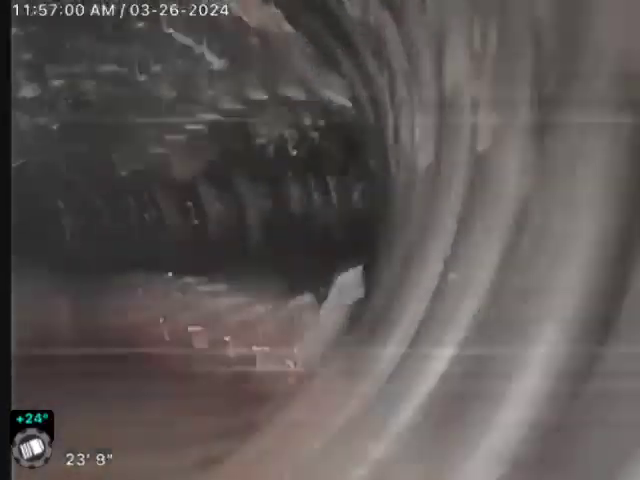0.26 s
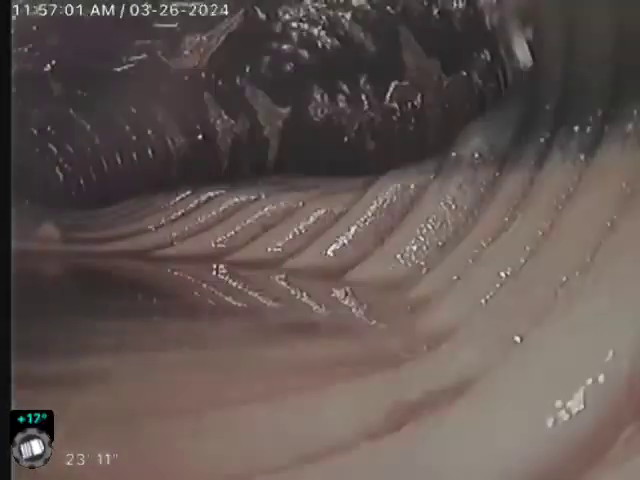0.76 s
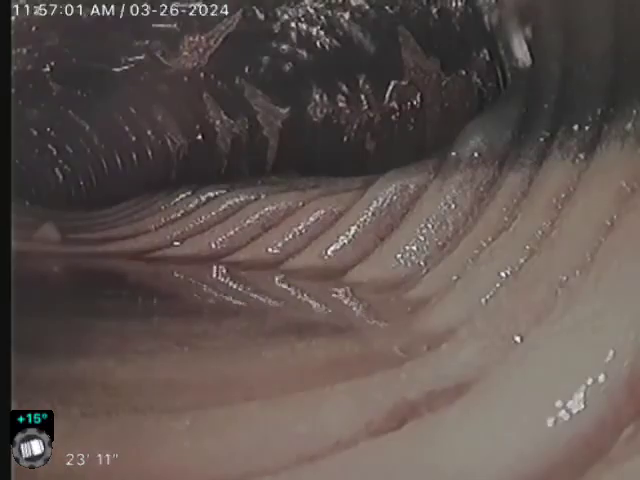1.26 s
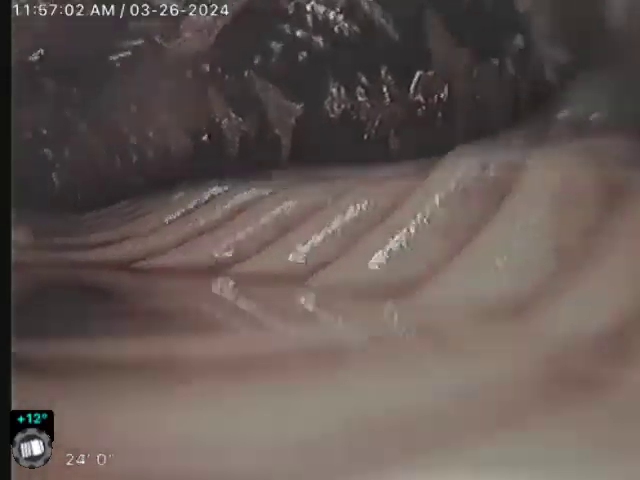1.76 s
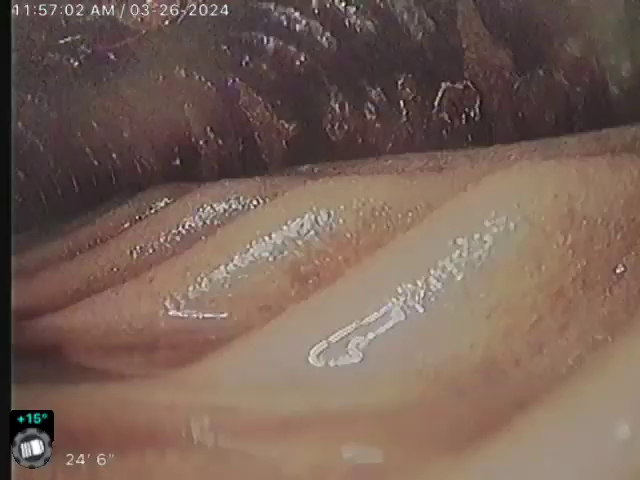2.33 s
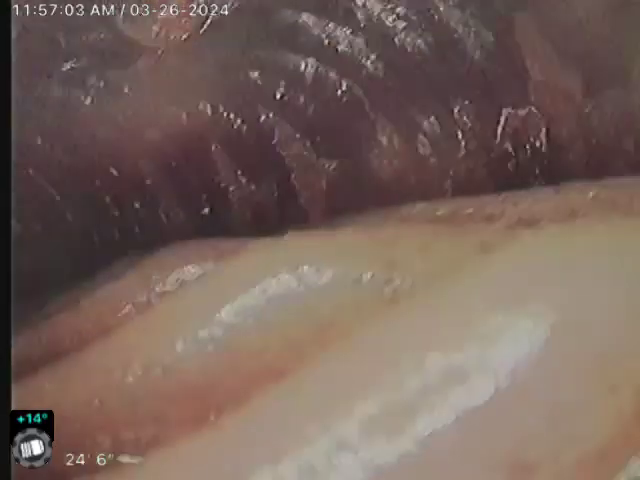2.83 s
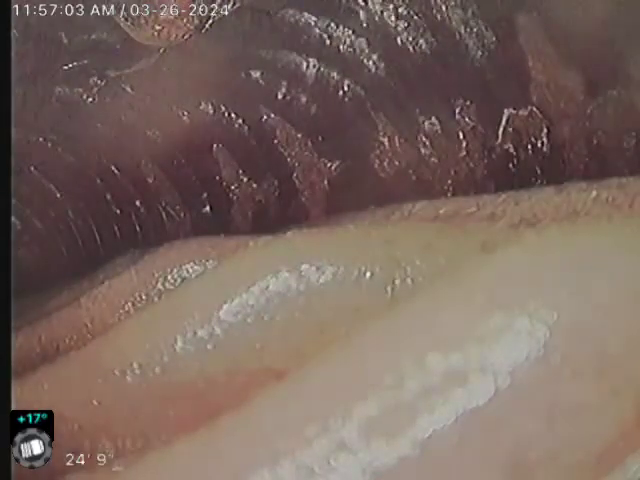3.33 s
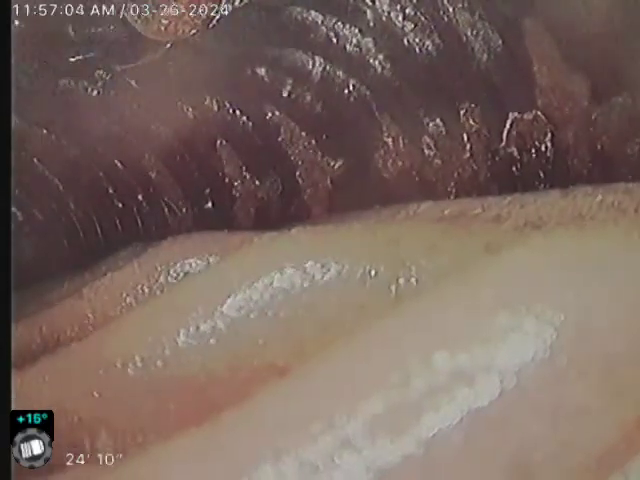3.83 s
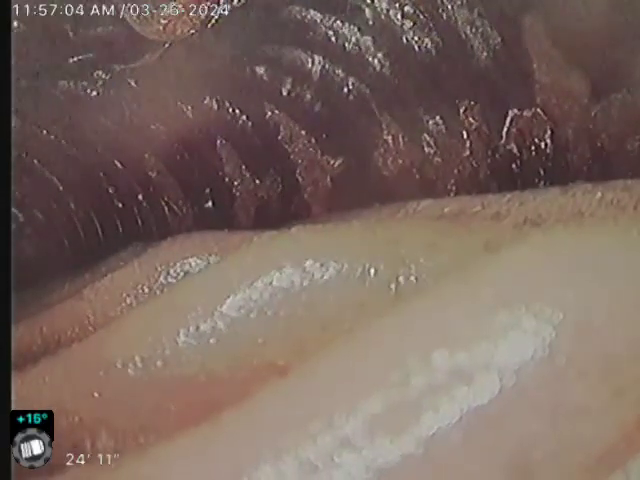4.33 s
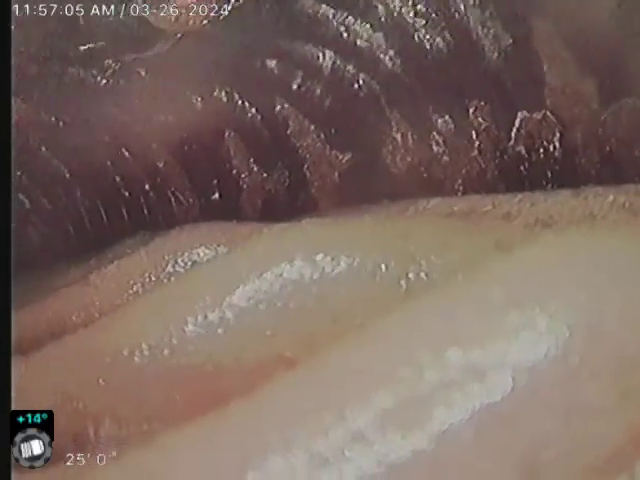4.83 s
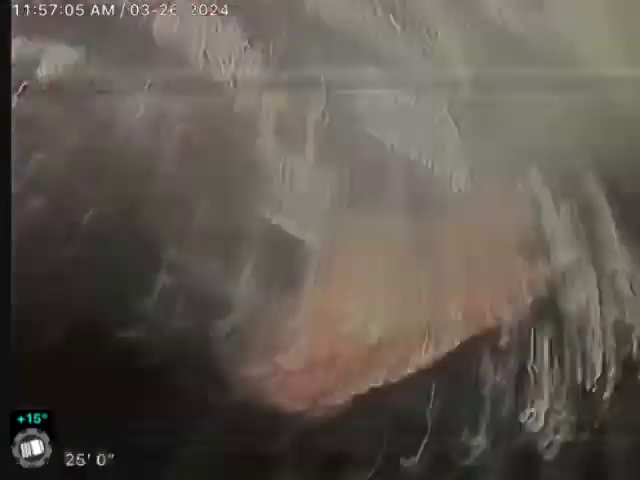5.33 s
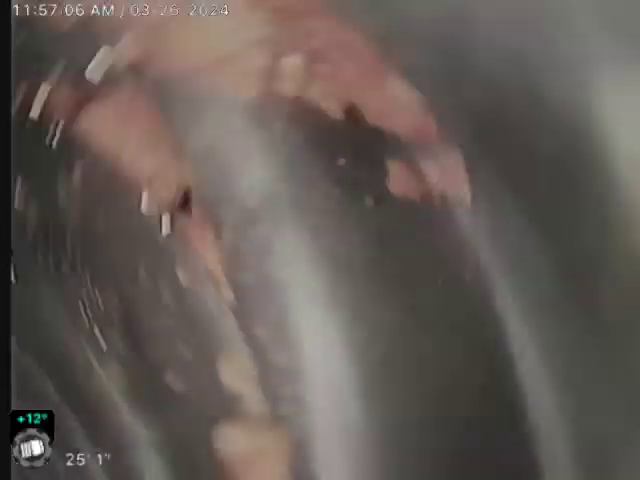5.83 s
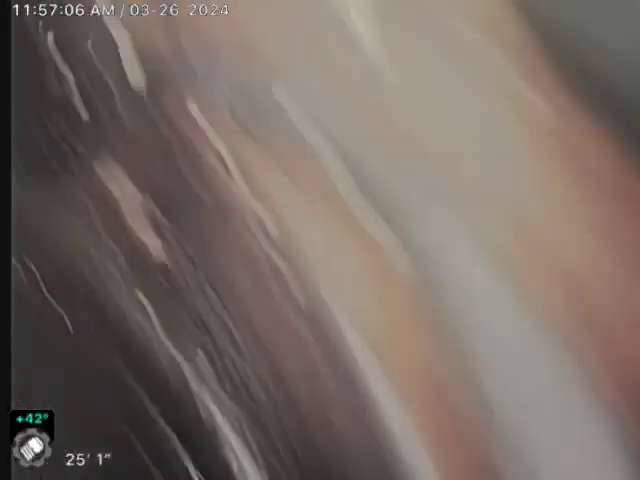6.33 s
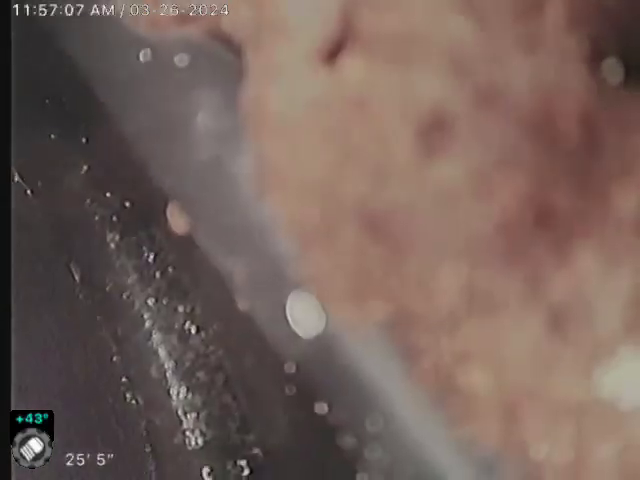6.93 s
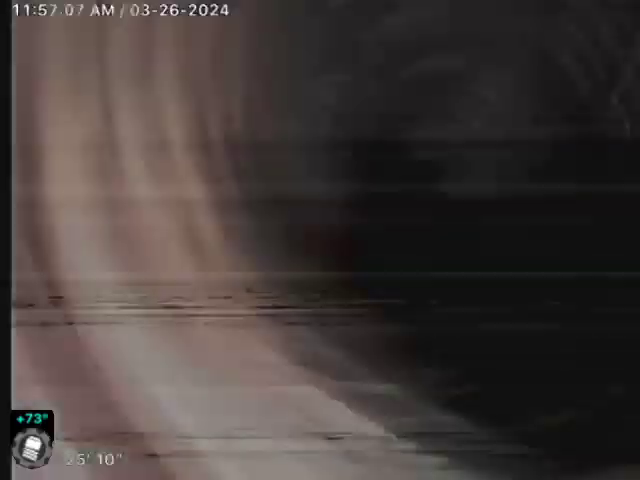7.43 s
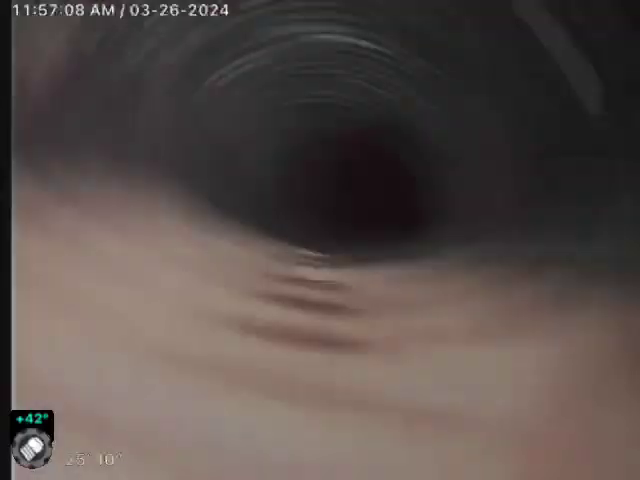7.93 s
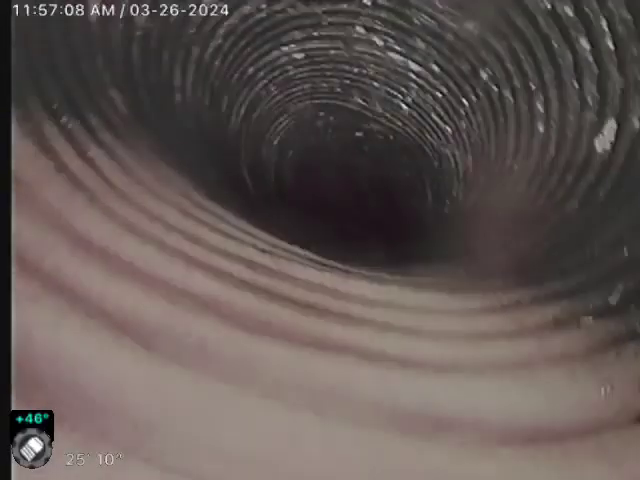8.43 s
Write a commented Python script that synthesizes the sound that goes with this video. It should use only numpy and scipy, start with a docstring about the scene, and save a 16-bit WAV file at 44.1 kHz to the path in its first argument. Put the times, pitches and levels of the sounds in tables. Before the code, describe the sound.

Close to a small, slightly dull microphone, a stiff springy rod is fed by gloved hands off a hollow reel frame. It begins with quiet scrapes and faint ringing, then sharper slaps, hollow knocks and low booms come in uneven bursts. A short rubber squeak precedes the busiest, loudest clatter just after five seconds. Further hard clacks follow beyond six and seven, then a lull and a last scrape. Faint mains hum and outdoor rumble lie underneath.

```python
"""A springy push rod, fed by hand from a reel into a drain, drags over the reel's hollow frame close to the microphone.
Friction noise through the frame's modes makes its boom, scrape and song; broad bands make the rasp and hiss of gloves.
Slaps of the rod are noise bursts smeared as bending waves, and a glove squeaks once as a wavering tone. Low noise swells
near 105 Hz. Far behind lie an outdoor rumble and a mains hum; the small built-in microphone stops near 7 kHz."""
import sys
import numpy as np
from scipy import signal
from scipy.fft import rfft, irfft, next_fast_len
from scipy.io import wavfile
from scipy.ndimage import uniform_filter1d, map_coordinates

SR = 44100
rng = np.random.default_rng(int(sys.argv[2]) if len(sys.argv) > 2 else 0)


def store_wav(level_fs):
    """Save 16-bit WAV to argv[1]."""
    pcm = np.round(np.clip(np.atleast_2d(level_fs), -1, 1) * 32767)
    wavfile.write(sys.argv[1], SR, pcm.T.astype(np.int16))


N = 383229  # length in samples

# Hand moves of the rod: time of full strength t/s, rise/s, hold/s, fall/s (before FALL_FACTORS), then the gains:
# frame shaking level/dB, rod dragging level/dB, guide singing level/dB, gloves rasping level/dB, gloves hissing level/dB
MOVES = [(0.031, 0.021, .002, .045, -43, -41.5, -61, -50, -51),
         (0.125, 0.031, .11, 0.065, -42.5, -43.5, -42.5, -55, -58),
         (0.358, 0.051, .08, 0.027, -50, -49, -50, -60, -61),
         (0.564, 0.0083, 0.06, 0.14, -62, -64, -61, -45, -44.5),
         (1.038, 0.0082, .002, 0.056, -65, -55, -43, -59, -56),
         (1.206, 0.076, 0.22, 0.026, -43, -48.5, -48, -61, -61),
         (1.507, 0.08, 0.014, 0.025, -33, -46.5, -59, -58, -60),
         (1.539, 0.01, 0.014, 0.018, -44, -39, -39, -65, -63),
         (1.566, 0.0091, 0.24, 0.18, -37.5, -41, -39, -52.5, -52.5),
         (1.924, .04, .002, 0.041, -46, -61, -62, -73, -69),
         (2.035, .06, .002, 0.086, -42.5, -49, -50.5, -57, -57),
         (2.229, 0.023, .002, 0.081, -42, -57, -56, -55, -47.5),
         (2.372, 0.012, .13, 0.031, -43, -46, -43, -50.5, -54),
         (2.538, 0.011, 0.0074, 0.15, -30, -34, -49, -36.5, -39.5),
         (2.887, .012, 0.1, .07, -47.5, -51, -69, -62, -61.5),
         (3.074, 0.054, .002, 0.12, -54, -50, -66, -61, -55),
         (3.135, 0.0072, .02, 0.037, -27.5, -34, -58, -49.5, -61),
         (3.17, 0.024, 0.023, 0.054, -21.5, -52, -69, -69, -76),
         (3.347, 0.082, 0.081, 0.054, -35, -39.5, -46, -52, -58),
         (3.469, .01, 0.058, 0.08, -44, -45, -43.5, -50, -53),
         (3.557, .04, 0.088, 0.04, -32.5, -40.5, -57, -47, -59),
         (3.666, 0.0124, .03, 0.088, -19.5, -43, -55, -37.5, -47),
         (3.762, 0.075, .002, 0.088, -33.5, -36, -39.5, -46, -48.5),
         (3.914, 0.0074, .002, 0.036, -38, -40, -31, -56, -64),
         (3.991, 0.035, .002, 0.056, -41.5, -42, -37, -47, -49),
         (4.082, 0.072, 0.038, 0.12, -55, -51, -63, -44, -47),
         (4.292, 0.12, 0.033, 0.12, -28.5, -39.5, -48, -44.5, -55),
         (4.527, .025, .015, 0.027, -38, -50, -62, -56, -67),
         (4.563, .008, 0.017, 0.034, -36.5, -56, -56, -53, -51),
         (4.636, 0.11, .002, 0.11, -38, -38.5, -56, -43.5, -49),
         (4.687, 0.068, 0.033, 0.02, -30.5, -46, -69, -63, -76),
         (4.783, 0.022, 0.062, .05, -47, -34, -44, -42.5, -53),
         (4.832, 0.09, 0.087, 0.063, -40.5, -32, -39, -40, -37),
         (5.046, 0.045, 0.034, .02, -49, -41.5, -61, -43.5, -67),
         (5.088, 0.0089, .048, 0.016, -49, -26.5, -30.5, -32, -32),
         (5.147, 0.0081, 0.0091, 0.049, -17.5, -26, -40, -28.5, -26),
         (5.207, .02, 0.028, 0.018, -32, -38.5, -55, -40, -63),
         (5.244, 0.0025, 0.004, 0.066, -25.5, -24, -31, -30.5, -28),
         (5.33, 0.033, .002, .1, -31, -30.5, -53, -46, -61),
         (5.386, 0.14, 0.0023, .2, -27, -45, -54.5, -52, -57),
         (5.49, .05, 0.021, .04, -35, -42, -62, -72, -71),
         (5.821, 0.28, 0.13, 0.1, -49.5, -58, -55, -51, -43.5),
         (6.082, 0.011, .03, .03, -31, -37, -44, -50, -50),
         (6.137, 0.057, 0.034, .02, -32, -28.5, -23.5, -36.5, -40),
         (6.183, 0.011, 0.0015, 0.19, -24.5, -25, -22.5, -26.5, -31.5),
         (6.372, 0.053, 0.0018, 0.071, -31.5, -35, -34.5, -33.5, -64),
         (6.66, 0.18, .02, 0.14, -31.5, -34, -67, -41.5, -54),
         (6.798, 0.008, 0.052, 0.045, -33.5, -32.5, -61, -36, -56),
         (6.883, .012, 0.11, 0.029, -37, -33.5, -37, -40.5, -41),
         (7.018, 0.026, 0.025, 0.035, -45, -47, -61, -52, -64),
         (7.134, 0.084, .06, 0.009, -36, -38.5, -45, -40, -51),
         (7.183, 0.0094, 0.043, 0.12, -31.5, -29.5, -22.5, -28, -31),
         (7.246, .04, 0.044, 0.077, -21.5, -24, -34, -37, -50),
         (7.364, 0.0049, 0.0081, 0.024, -36, -29.5, -39, -27, -52),
         (7.399, .02, 0.077, 0.14, -32.5, -35.5, -48.5, -49, -70),
         (7.658, 0.29, 0.0014, 0.087, -50, -58, -57.5, -54, -44.5),
         (7.742, 0.044, .002, .05, -46, -46, -60, -58, -61),
         (7.849, 0.014, 0.1, 0.22, -68, -56.5, -62, -53.5, -44.5),
         (8.158, .008, 0.1, .03, -58, -47, -42, -55, -58),
         (8.256, 0.049, 0.021, 0.033, -32, -33.5, -32.5, -46, -48),
         (8.311, 0.042, 0.044, 0.065, -25.5, -31, -31.5, -38.5, -41),
         (8.377, 0.054, 0.27, .05, -38, -35, -34, -44, -50),
         (8.474, 0.064, 0.0023, 0.12, -34, -32.5, -29, -43, -45),
         (8.68, 0.069, 0.018, .02, -30.5, -36, -38, -43, -51)]
# Stretch of a move's fall: one factor each for shaking, dragging, singing, rasping, hissing
FALL_FACTORS = [1.25, 1.25, 0.63, 0.81, 0.75]
# Resting gain under the moves: level/dB each for shaking, dragging, singing, rasping, hissing
RESTING_DB = [-51, -52, -72.5, -85, -85]
# Low modes of the hollow frame: f/Hz, width/Hz (before the shaking boom broadens it), relative level/dB
FRAME_MODES = [(234.7, 14.6, 5), (295.7, 23, -1.5), (431.7, 6, 0)]
# Upper modes of the frame, woken by drag and knocks: f/Hz, width/Hz, relative level/dB
GUIDE_MODES = [(476, 48, 0), (665, 222, -4), (818, 72, 0.5), (984, 112, -2), (1230, 253, -4),
               (1880, 470, -11.5), (2206, 120, -11)]
# Narrow modes of the guide that sing under the moving rod: f/Hz, width/Hz, relative level/dB
SINGING_MODES = [(986, 34, 16.5), (1316, 17, 15), (1850, 230, -2.5), (2793, 110, -3), (4160, 42, -1.5),
                 (4700, 140, 2.5)]
# Slaps of the rod: t/s, crack peak level/dB, crack centre f/Hz, knock level/dB over crack,
# boom level/dB over crack, rattle T60 t/s
SLAPS = [(1.0364, -45, 1610, 3, -19, .12), (1.575, -24.5, 4710, -22, -23, 0.064),
         (2.2153, -36, 5790, -9, -11, .1), (2.368, -31, 2030, 0, -22, 0.1),
         (2.4372, -43, 2660, 20, -7, .11), (2.5369, -15.5, 2220, 0, 0.5, 0.064),
         (2.5929, -31, 2900, 10.5, 8, .07), (3.1401, -30.5, 1920, 3, 7.5, 0.071),
         (3.1723, -28, 2520, 2, 14, .1), (3.3698, -39, 2020, 15.5, 15, .17),
         (3.4754, -28.5, 2880, 0, -18, .061), (3.6504, -4, 2160, -3, 2, 0.064),
         (3.674, -20, 1960, 4, -4, 0.055), (3.7604, -35, 2100, 12, -11, 0.12),
         (3.909, -22.5, 1840, -5, -18, 0.066), (3.9946, -23, 1980, -4, -2.5, 0.076),
         (4.2955, -22, 1860, -16.5, -6, 0.089), (4.3192, -27, 1730, -15, -9, 0.087),
         (4.623, -23.5, 1600, -19, -28, 0.15), (4.7399, -11.5, 4960, -3.5, -22, 0.054),
         (5.0887, -27, 4620, -18, -24, .1), (5.144, -3, 4470, -24, -17.5, 0.041),
         (5.2435, -16.5, 1920, -8, -14, .055), (5.3361, -20.5, 1960, -10, -14, 0.15),
         (5.3586, -41, 1510, 6, 11, .1), (5.3977, -35, 1590, -6, 13, .1),
         (6.1757, -4.5, 3320, -7.5, -7, 0.042), (6.2114, -19.5, 4170, -7.5, 4, 0.1),
         (6.344, -20.5, 1900, -0.5, -23, 0.16), (6.876, -26.5, 1780, 4, -7, 0.088),
         (7.1811, -14.5, 4800, -6.5, -18, 0.088), (7.3636, -9, 1950, -16, -23, 0.087),
         (8.3116, -18.5, 2870, -9, -25, 0.071)]
# Course of the glove's squeak on the rod: t/s, f/Hz, level/dB of the first partial
SQUEAK = [(4.612, 577, -58), (4.635, 603, -40), (4.655, 700, -33), (4.685, 650, -40.5), (4.71, 650, -56)]
# Swells of the low rumble near 105 Hz: t/s, level/dB
LOW_SWELLS = [(2.59, -37), (3.34, -53), (3.648, -40.5), (5.15, -34), (5.389, -28.5), (6.191, -39.5),
              (6.9, -36.5), (7.19, -33.5), (7.82, -46.5), (8.59, -41)]
# Mains hum partials: f/Hz, level/dB rms about which each wavers
HUM = [(59.5, -48), (119, -57.5)]
# Spectrum of the outdoor rumble: f/Hz, relative level/dB per Hz
OUTSIDE = [(12, -34.5), (20, -9.5), (76, 9.5), (167, -13.5), (242, -1), (387, -21.5), (449, -7.5),
           (634, -14.5), (1010, -9.5), (3310, -36), (6300, -70.5), (6780, -44.5), (7300, -79.5),
           (9490, -103), (16100, -120)]

SWING_DB = 18.5  # an event gains this over its rise time and loses it over its fall time
LOW_RISE_S, LOW_FALL_S, LOW_REST_DB = 0.16, 0.2, -44.5  # shape of a low swell; level between swells
CONTACT_T60_S = 0.0038  # decay of the blow of a full-scale slap
SOFTER_LONGER = 0.34  # the blow lengthens by this share of the decibels a slap lies under full scale
ROD_PATH, BOOM_PATH = 0.387, 0.931  # shares of the rod that the bending wave crosses
SQUEAK_OVERTONE_DB, SQUEAK_JITTER_RAD = -9.5, 1.1  # second partial over first; phase unrest
TOP_HZ = 6930  # band limit of the recorder


def move_gain(layer):
    """Gain that the hand's moves give one of the five layers of MOVES."""
    s, rise, hold, fall, *levels = np.transpose(MOVES)
    return swells(s, rise, hold, FALL_FACTORS[layer] * fall, levels[layer], RESTING_DB[layer])


def frame_shaking():
    """Each push excites the hollow frame's low modes, broadened into a fuller, steadier boom."""
    broad = [(hz, 1.5 * width, db) for hz, width, db in FRAME_MODES]
    boom = unit(filtered(rubbing(0.95, 0.97), resonant(broad + [(357, 107, -8.5)])))
    # level out chance swells so that the push sets the loudness
    boom /= np.sqrt(uniform_filter1d(boom ** 2, size=2600) + 0.36)
    return move_gain(0) * boom


def rod_dragging():
    """Friction of the rod on the guide scrapes through the frame's upper modes."""
    return move_gain(1) * unit(filtered(rubbing(0.67, 1.9), resonant(GUIDE_MODES)))


def guide_singing():
    """The same kind of friction rings the guide's narrow modes."""
    return move_gain(2) * unit(filtered(rubbing(0.8, 1.5), resonant(SINGING_MODES)))


def gloves_rubbing():
    """The rod slides through the gloves: friction noise in a rasping and a hissing band."""
    rasp_band, hiss_band = resonant([(2800, 2200, 0)]), resonant([(5500, 3200, 0)])
    rasp = unit(filtered(rubbing(1.2, 2.0), lambda hz: rasp_band(hz) ** 2))
    hiss = unit(filtered(rubbing(1.0, 0.87), lambda hz: hiss_band(hz) ** 2))
    return move_gain(3) * rasp + move_gain(4) * hiss


def slaps():
    """A slap travels along the rod as a bending wave, treble first, then rattles and rings the frame."""
    out, t = np.zeros(N + SR), np.arange(SR // 3) / SR

    def decay(t60):
        return amp(-60 * t / t60)

    def bending(hz, path):
        # delay ~ 1 / sqrt(Hz), less a constant that brings the treble to the start
        return np.exp(path * (-1j * 2.2 * np.sqrt(hz) + 2j * np.pi * hz * 0.002493))

    def peak(x):
        return x / np.abs(x).max()

    frame, guide = resonant(FRAME_MODES), resonant(GUIDE_MODES)
    boom = peak(filtered(decay(0.00039), lambda hz: bending(hz, BOOM_PATH) * frame(hz)))
    for s, db, crack_hz, knock_db, boom_db, rattle_t60 in SLAPS:
        noise = rng.standard_normal((3, len(t)))
        blow = decay(CONTACT_T60_S * amp(-SOFTER_LONGER * db)) * noise[0]
        rattle = 0.34 * noise[1] * decay(rattle_t60)
        tail = 0.27 * noise[2] * decay(0.13)
        contact = resonant([(crack_hz, 0.92 * crack_hz, 0)])
        crack = peak(filtered(blow + rattle, lambda hz: bending(hz, ROD_PATH) * contact(hz) ** 2))
        knock = peak(filtered(blow + tail, lambda hz: bending(hz, ROD_PATH) * guide(hz)))
        slap = crack + amp(knock_db) * knock + amp(boom_db) * boom
        out[round(s * SR):][:len(t)] += amp(db) * slap
    return out[:N]


def squeak():
    """Rubber sticks and slips on the rod for a moment: a gliding, wavering tone and its octave."""
    s, hz, db = np.transpose(SQUEAK)
    t = np.arange(N) / SR
    phase = 2 * np.pi * np.cumsum(np.interp(t, s, hz)) / SR + SQUEAK_JITTER_RAD * wobble(90)
    level = amp(np.interp(t, s, db, left=-120, right=-120) + 2.5 * wobble(60))
    return np.sqrt(2) * level * (np.sin(phase) + amp(SQUEAK_OVERTONE_DB) * np.sin(2 * phase))


def low_rumble():
    """Uneven noise through one resonance near 105 Hz swells now and then over a steady level."""
    s, db = np.transpose(LOW_SWELLS)
    rumble = unit(filtered(rubbing(2, 0.62), resonant([(105, 59, 0)])))
    return swells(s, LOW_RISE_S, 0, LOW_FALL_S, db, LOW_REST_DB) * rumble


def mains_hum():
    """Mains partials, each unsteady in level and phase."""
    t = np.arange(N) / SR
    hum = np.zeros(N)
    for hz, db in HUM:
        level = np.sqrt(2) * amp(db + 1.6 * wobble(2.1))
        hum += level * np.sin(2 * np.pi * hz * t + 1.4 * wobble(14))
    return hum


def outdoor_rumble():
    """Distant rumble: patchy noise shaped to the outdoor spectrum, slowly swelling."""
    rumble = unit(filtered(patchy(1.0), lambda hz: along(OUTSIDE, hz)))
    return amp(-45.5 + 1.5 * wobble(0.66)) * rumble


def rubbing(grit_db, depth_db):
    """Uneven noise, as of friction: its strength varies quickly, like grit under the rod."""
    return patchy(depth_db) * amp(grit_db * wobble(180) + grit_db * wobble(45))


def patchy(depth_db):
    """White noise with patches of random gain in time and frequency."""
    z = signal.stft(rng.standard_normal(N), nperseg=512)[2]
    across_f = uniform_filter1d(rng.standard_normal(z.shape), 5, 0)
    field = uniform_filter1d(across_f, 8, 1)
    return signal.istft(z * amp(depth_db * unit(field)), nperseg=512)[1][:N]


def swells(s, rise, hold, fall, db, rest_db):
    """Gain over time: rise, hold and fall of every event, their powers added to a resting level."""
    late = np.arange(0, N / SR, 1 / 1000)[:, None] - s  # one row a millisecond
    down = np.clip(-late, 0, None) / rise + np.clip(late - hold, 0, None) / fall
    gain = np.sqrt(np.sum(amp(db - SWING_DB * down) ** 2, axis=1) + amp(rest_db) ** 2)
    return np.interp(np.arange(N) / SR * 1000, np.arange(len(gain)), gain)


def resonant(modes):
    """Causal response of (Hz, width Hz, dB) resonances, alternating in sign."""
    return lambda f: sum((-1) ** k * amp(db) * 1j * f * w / (c * c - f * f + 1j * f * w)
                         for k, (c, w, db) in enumerate(modes))


def filtered(x, response):
    """x shaped by a complex response of frequency."""
    m = next_fast_len(len(x) + SR // 2)
    return irfft(rfft(x, m) * response(np.fft.rfftfreq(m, 1 / SR)), m)[:len(x)]


def along(points, hz):
    """Gain of (Hz, dB) points joined on a log axis."""
    f, db = np.transpose(points)
    return amp(np.interp(np.log(hz + 1), np.log(f + 1), db, left=-120, right=-120))


def wobble(rate):
    """A smooth random curve with rate knots a second."""
    knots = rng.standard_normal(int(N * rate / SR) + 4)
    return map_coordinates(knots, [np.arange(N) * rate / SR])


def amp(db):
    """Decibels to gain."""
    return 10 ** (np.asarray(db) / 20)


def unit(x):
    """x scaled to rms 1."""
    return x / np.sqrt(np.mean(x ** 2) + 1e-20)


def scene():
    """Rod, frame, gloves and background add up at one microphone."""
    rod = frame_shaking() + rod_dragging() + guide_singing() + gloves_rubbing()
    return (rod + slaps() + squeak() + low_rumble() + mains_hum() + outdoor_rumble())[None]


def record(dry):
    """The input stage rounds off the loudest peaks; the recorder rolls off steeply at its band limit."""
    soft = dry[0] / (1 + np.abs(dry[0] / 0.95) ** 6) ** (1 / 6)
    return filtered(soft, lambda hz: (hz < 1.05 * TOP_HZ) / (1 + (hz / TOP_HZ) ** 150))[None]


dry = scene()
out = record(dry)
store_wav(out)
```